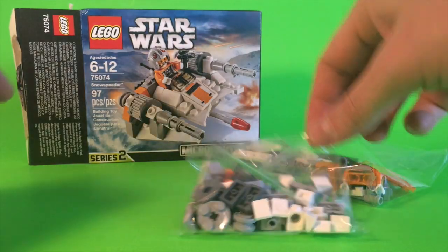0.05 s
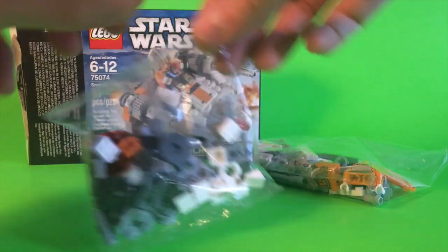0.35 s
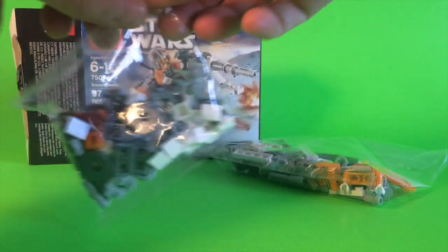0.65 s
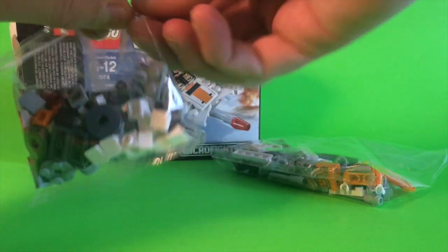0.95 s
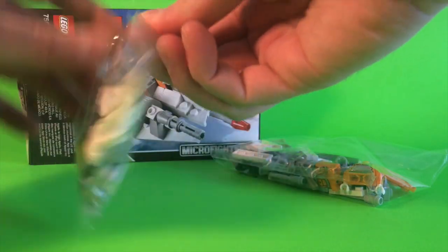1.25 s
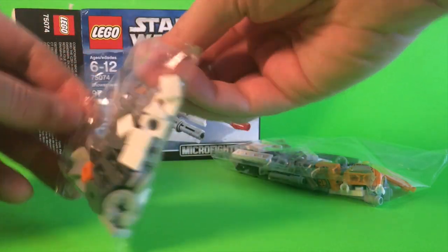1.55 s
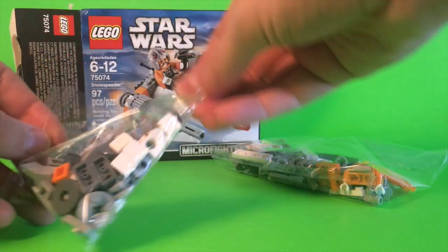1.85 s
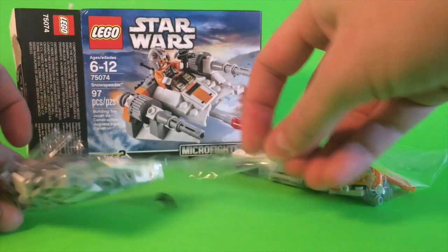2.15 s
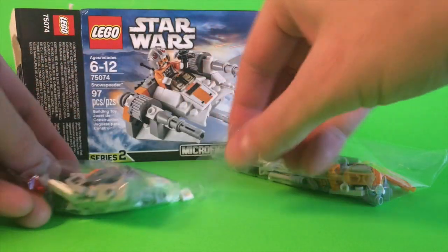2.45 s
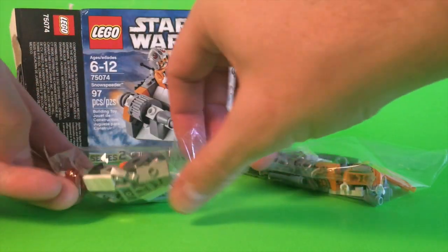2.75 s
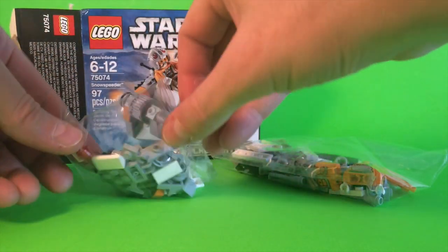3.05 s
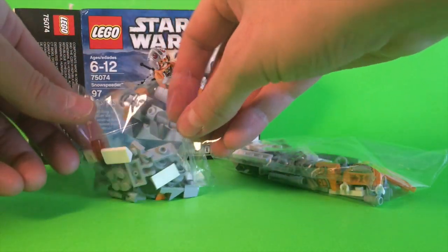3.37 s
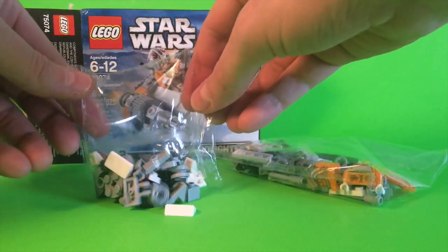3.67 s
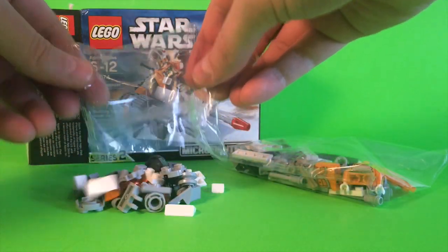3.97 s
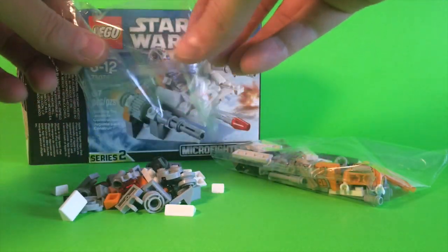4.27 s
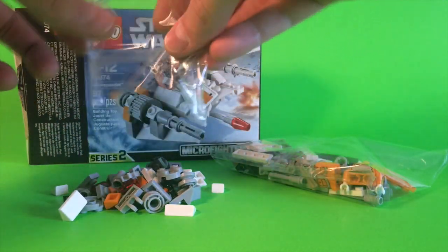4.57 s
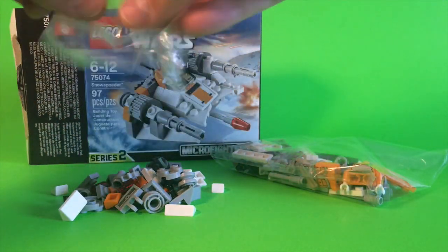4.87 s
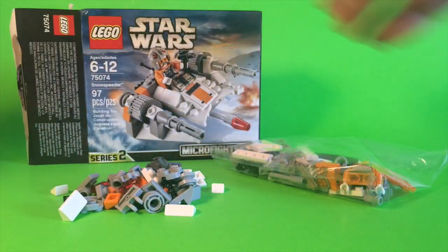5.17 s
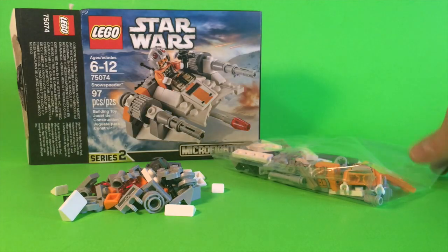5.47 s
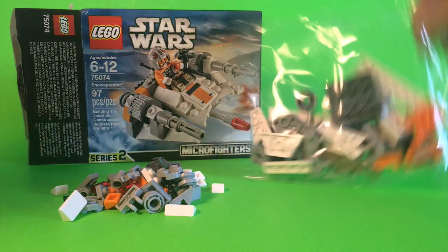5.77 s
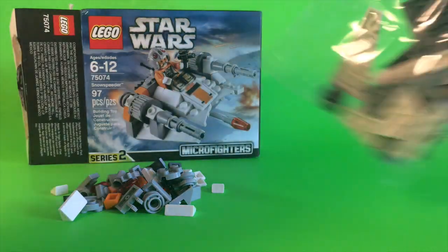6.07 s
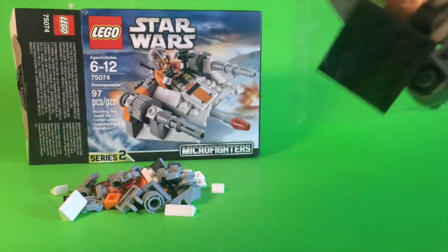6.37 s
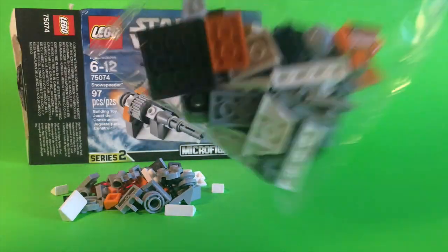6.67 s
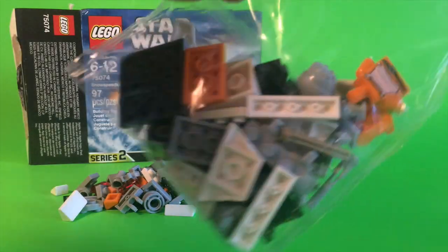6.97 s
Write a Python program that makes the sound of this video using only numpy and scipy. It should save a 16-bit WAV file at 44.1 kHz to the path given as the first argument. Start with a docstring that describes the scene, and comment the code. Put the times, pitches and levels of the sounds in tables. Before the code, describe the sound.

A thin plastic bag crinkles and snaps as it is pulled open and emptied, then small plastic bricks rattle in another bag.

```python
"""A thin plastic bag is pulled open on a table, and small plastic bricks are shaken out of it.
Its creases buckle in sharp snaps over a fine crinkle of tiny ticks; the bag's wall adds a hollow body
and the shifting load dull bumps. Then a second, full bag is lifted close to the microphone, and its
bricks slide, clack and ring. Underneath lie low room noise, a short opening hiss and a hum that
swells at the end. The room is small and fairly dry."""
import sys
import numpy as np
from scipy import signal
from scipy.fft import rfft, irfft
from scipy.io import wavfile
from scipy.ndimage import uniform_filter1d

SR = 44100
rng = np.random.default_rng(int(sys.argv[2]) if len(sys.argv) > 2 else 0)


def int16_out(signal):
    """Quantize to a 16-bit WAV file."""
    q = np.round(np.clip(np.atleast_2d(signal).T, -1, 1) * 32767)
    wavfile.write(sys.argv[1], SR, q.astype(np.int16))


N = 313992
TIME = np.arange(N) / SR
FULL_BAG_S = 5.55  # the full bag takes over here

# The room tone's fader. Each row: time in seconds, level in dB.
ROOM_TONE_FADER = [(0, -84), (.5, -70.5), (1.2, -61.5), (5.5, -61.5), (7.12, -65.5)]
# The low hum's fader. Each row: time in seconds, level in dB.
HUM_FADER = [(0, -86), (6.74, -62.5), (6.86, -57), (7.12, -48.5)]
# The first bag's loudest snaps, from creases buckling and bricks touching.
# Each row: start in seconds, level in dB, centre pitch in Hz.
FILM_SNAPS = [(.0817, -43, 6300), (.2393, -44.5, 4900), (.2807, -46.5, 9050), (.3294, -44, 6300),
              (.36, -41.5, 6850), (.5764, -37, 9600), (.6019, -38.5, 5100), (.6479, -39, 10500),
              (.668, -32, 7540), (.78, -39.5, 6100), (.9109, -29, 7900), (1.0475, -33, 5800),
              (1.07, -36, 6950), (1.1258, -33, 7100), (1.14, -31, 5500), (1.2074, -28, 5840),
              (1.3192, -26, 5860), (1.4355, -27, 6500), (1.462, -24, 7700), (1.5639, -26, 8150),
              (1.5876, -29.5, 6000), (1.6386, -34, 6830), (1.6467, -24, 7095), (1.6922, -27.5, 7850),
              (1.7253, -28.5, 6100), (1.7853, -35, 5450), (1.852, -30, 9770), (1.8618, -30.5, 8150),
              (1.9571, -25.5, 7300), (2.0036, -25.5, 7840), (2.0493, -29.5, 5120), (2.0667, -32, 9100),
              (2.076, -29.5, 6740), (2.1104, -26, 9700), (2.1263, -29, 10300), (2.1626, -32.5, 6820),
              (2.191, -29, 8600), (2.2151, -28, 8810), (2.2287, -25, 6400), (2.4699, -31, 8434),
              (2.5146, -30.5, 3094), (2.59, -34.5, 5230), (2.7013, -33.5, 8020), (2.777, -38.5, 5380),
              (2.845, -37, 5210), (2.8785, -27, 6580), (2.9357, -40, 4900), (3.0276, -29, 4010),
              (3.2182, -30.5, 7470), (3.3059, -30.5, 4495), (3.3335, -35, 2800), (3.3688, -29, 5990),
              (3.4258, -32.5, 6270), (3.4403, -32, 8500), (3.521, -26.5, 9700), (3.5971, -29, 5723),
              (3.654, -34, 4226), (3.695, -31, 6300), (3.706, -26.5, 6540), (3.8393, -29.5, 7107),
              (4.1151, -30, 5397), (4.1727, -33.5, 4494), (4.2247, -34, 7510), (4.2438, -27.5, 8080),
              (4.282, -28, 9770), (4.293, -29, 8004), (4.2997, -26, 7373), (4.3982, -29.5, 5044),
              (4.424, -22.5, 8880), (4.4814, -20.5, 5310), (4.6575, -24.5, 5407), (4.706, -25, 5494),
              (4.7518, -20.5, 6494), (4.8537, -22.5, 7780), (4.9172, -29, 5490), (4.972, -26, 6997),
              (5.0568, -25.5, 7396), (5.1385, -29.5, 5093), (5.1648, -30, 4885), (5.2867, -34, 7397),
              (5.4637, -43, 6860)]
# One rustle per hand move: the first bag is picked up, torn open, shaken out and crumpled, then the
# full one is lifted. Taut film is bright; slack film lets the body sound. Each row: start in seconds,
# length in seconds, level in dB, growth over the move in dB, brightness in dB, body against crinkle in dB.
HAND_MOVES = [ (0.296, 0.16, -60, -2, -1.5, -10), (0.59, 0.12, -48.5, -3.5, 1, -3),
              (0.804, .26, -48.5, 3.5, 2, -7.5), (1.123, 0.18, -41.5, 6, 2, -3.5),
              (1.314, 0.27, -38.5, -7, 2, -9), (1.677, .28, -43, -1.5, -1.5, -9.5),
              (2.029, 0.21, -37.5, 12, 1.5, -16), (2.279, 0.085, -48, 0, -1.5, -20),
              (2.371, 0.044, -39, -1, 1.5, -17), (2.478, 0.29, -43.5, 0, -1.5, -13.5),
              (2.849, 0.31, -41.5, 3, -2, -5), (3.188, .13, -46, -12, -0.5, -6),
              (3.421, .23, -40.5, -1, -1, -9), (3.72, 0.25, -44, 1, 1, -9.5),
              (3.972, .23, -41.5, -6, 1.5, -8), (4.289, .2, -41, 1, 2, -8), (4.504, 0.12, -32, 6, 2, -13),
              (4.746, 0.11, -32.5, -5, 2, -10.5), (4.88, 0.052, -40, -3, 1, -5),
              (4.966, .105, -34.5, 0, 3.5, -12), (5.118, .085, -42.5, -1, 1.5, -14),
              (5.305, 0.089, -43.5, 8, 2, -14.5), (5.548, 0.26, -48.5, -2.5, -6.5, -1.5),
              (5.8, .11, -39, 2, -9, -7.5), (5.912, .12, -34, -3, -3, -7.5), (6.039, 0.066, -29, 1, 1, -15),
              (6.125, .09, -43, -6, -6, 3), (6.285, 0.092, -34.5, 14, -1.5, -14.5),
              (6.423, 0.097, -32, -1, -0.5, -16), (6.711, .11, -43.5, 7, -4.5, -8),
              (6.851, 0.15, -52.5, 7, -4, -15)]
# Dull bumps as a bag's load shifts. Each row: start in seconds, level in dB, length in seconds.
LOAD_BUMPS = [(.335, -59.5, 0.052), (0.638, -53, 0.042), (1.324, -38.5, 0.025), (1.5, -55, .025),
              (2.85, -51, .04), (4.601, -53, .04), (4.772, -49, .02), (5.056, -52, 0.026),
              (5.903, -38.5, 0.031), (5.974, -42.5, 0.14), (6.295, -45, 0.11), (6.42, -37, 0.044),
              (6.479, -38, 0.041), (6.755, -45, 0.065), (6.999, -39.5, 0.027), (7.044, -36, 0.026)]
# A whole fold collapses in one short crunch. Each row: start in seconds, level in dB.
FOLD_CRUNCHES = [(.497, -50.5), (0.551, -45), (.897, -40.5), (1.314, -27.5), (1.513, -28), (1.682, -35.5),
                 (2.182, -33), (3.02, -34), (3.132, -35), (3.36, -37), (3.507, -37), (3.587, -36),
                 (4.412, -35.5), (4.772, -29.5), (5.922, -26), (6.439, -28.5), (6.64, -46.5),
                 (6.983, -40.5)]
# Single bricks chatter as they slide.
# Each row: start in seconds, level in dB, length in seconds, pitch in Hz.
BRICK_CHATTERS = [(1.13, -48, .08, 950), (3.302, -35, 0.0073, 3804), (6.042, -24, .035, 6700),
                  (6.36, -45, .18, 2842), (6.436, -33.5, 0.065, 4430), (6.805, -37, 0.043, 6230)]
# Bricks knock together in the full bag. Each row: start in seconds, level in dB, centre pitch in Hz.
BRICK_CLACKS = [(5.5915, -29.5, 2940), (5.6309, -37.5, 2870), (5.6582, -30.5, 4600), (5.717, -33.5, 5700),
                (5.9218, -19.5, 5300), (5.9467, -26.5, 4700), (6.101, -21, 4640), (6.1139, -24.5, 5800),
                (6.2254, -33, 3350), (6.244, -37, 7600), (6.2833, -26, 3584), (6.2905, -32, 4120),
                (6.375, -24, 4600), (6.3864, -29, 5480), (6.4443, -19.5, 4100), (6.4553, -23, 4490),
                (6.4883, -20, 4100), (6.5377, -23, 3640), (6.6731, -34.5, 6990), (6.708, -29, 3770),
                (6.7239, -26.5, 5060), (6.7457, -21, 3220), (6.7638, -22, 5135), (6.7969, -19, 5790),
                (6.8075, -24.5, 5850), (6.9466, -32, 4020), (7.0066, -22.5, 5300), (7.0512, -21, 5340),
                (7.0576, -24.5, 5100)]
# The bricks' ringing modes. Each row: pitch in Hz, relative level in dB, time to fall 60 dB in seconds.
BRICK_RESONANCES = [(1394, 2, 0.02), (2940, 5.5, 0.014), (4450, 9.5, 0.0092), (5100, 7.5, 0.016),
                    (5770, 10.5, 0.0072), (6640, 6, 0.015), (8340, 3.5, 0.021)]
# EQ curves that give each layer its colour. Each row: frequency in Hz, gain in dB.
ROOM_TONE_EQ = [(20, -48), (55, 4.5), (90, -1.5), (150, 5.5), (330, -7.5), (2000, -18), (15000, -30)]
HISS_EQ = [(60, -16), (400, -12.5), (1900, -8.0), (4200, -16), (5500, -42)]
FILM_EQ = [(100, -3.5), (400, -5), (900, 2), (2000, 1.5), (3500, 1), (6500, 0), (8500, -3.5), (11500, 0),
           (15000, -6.5)]
BAG_WALL_EQ = [(25, -41), (60, -19), (170, -14.5), (450, -3.5), (900, 6.5), (1350, 0.5), (2200, -13),
               (4000, -20)]
BUMP_EQ = [(30, -36), (80, -11.5), (170, -3), (240, -2), (400, -13), (1500, -47)]
BRICK_EQ = [(80, -6.5), (250, 6), (1700, -1.5), (3000, -5), (6500, -6.5), (9000, -7), (12000, -7),
            (15000, -15.5)]
# The room's reverb time. Each row: frequency in Hz, time to fall 60 dB in seconds.
REVERB_DECAY = [(150, 0.59), (15000, 0.2)]


def gain_of(db):
    """Decibels to a factor."""
    return 10 ** (np.asarray(db) / 20)


def unit_rms(x):
    """Scales to rms 1."""
    return x / np.sqrt(np.mean(x ** 2) + 1e-20)


def levelled(x, span_s):
    """Rides the gain to hold rms 1 over each span, keeping the finer grain."""
    size = max(int(span_s * SR), 8)
    power = abs(uniform_filter1d(uniform_filter1d(x ** 2, size), size))
    return x / np.sqrt(power + 1e-9 * np.mean(x ** 2))


def curve_at(curve, hz):
    """A curve's value at hz, on a log frequency axis."""
    points_hz, values = np.transpose(curve)
    return np.interp(np.log(hz + 1), np.log(points_hz + 1), values)


def fader(rows):
    """Fader points in dB to a gain for every sample."""
    return gain_of(np.interp(TIME, *np.transpose(rows)))


def add(mix, s, sound):
    """Mixes a sound in at s seconds."""
    part = mix[max(round(s * SR), 0):][:len(sound)]
    part += sound[:len(part)]


def coloured_noise(eq):
    """White noise through an EQ curve."""
    return irfft(rfft(rng.standard_normal(N)) * gain_of(curve_at(eq, np.fft.rfftfreq(N, 1 / SR))), N)


def swell(length_s):
    """An envelope with a quick rise and a rounded fall."""
    u = np.arange(SR // 2) / SR / length_s
    return (1 - np.exp(-10 * u)) * np.exp(-u ** 2)


def grains(per_s, spread_db):
    """A random train of many small and a few large impulses; rate and spread may vary over time."""
    train = np.zeros(len(per_s))
    at = np.flatnonzero(rng.random(len(per_s), dtype=np.float32) < per_s / SR)
    size_db = np.broadcast_to(spread_db, train.shape)[at] * np.minimum(rng.exponential(1, len(at)), 4)
    train[at] = gain_of(size_db) * rng.choice([-1., 1.], len(at))
    return train


def ringing(hz, t60, per_s, spread_db, size=N):
    """One resonance struck at random moments; rms 1."""
    t = np.arange(SR // 10) / SR
    ring = gain_of(-60 * t / t60) * np.sin(2 * np.pi * hz * t)
    strikes = grains(np.full(size, per_s), spread_db)
    return unit_rms(signal.oaconvolve(strikes, ring)[:size])


def room_tone(hum_hz=112.3):
    """A bed of low room noise, and a faint hum that swells near the end."""
    noise = fader(ROOM_TONE_FADER) * unit_rms(coloured_noise(ROOM_TONE_EQ))
    return noise + fader(HUM_FADER) * np.sin(2 * np.pi * hum_hz * TIME)


def soft_hiss():
    """A dull, faint hiss at the very start that fades out after a quarter second."""
    fade = np.interp(TIME, [.23, .27], [1, 0])
    return gain_of(-59.5) * fade * unit_rms(coloured_noise(HISS_EQ))


def patch_response(eq, centre_hz, focus_db, ripple_db, size=1024):
    """One small patch of plastic, tapped: its EQ, a hump at its own pitch, and chance resonances."""
    hz = np.fft.rfftfreq(size, 1 / SR)
    hump = np.exp(-np.log2((hz + 1) / centre_hz) ** 2)
    ripple = unit_rms(uniform_filter1d(rng.standard_normal(len(hz)), size=14))
    spectrum_db = curve_at(eq, hz) + focus_db * hump + ripple_db * ripple
    # minimum phase keeps the attack at the very front
    cepstrum = irfft(np.log(gain_of(spectrum_db)))
    cepstrum[1:size // 2] *= 2
    cepstrum[size // 2 + 1:] = 0
    return irfft(np.exp(rfft(cepstrum)))


def jolts(crack_s, shiver_s, shiver_db, size=1024):
    """A quick scatter of jolts, and the weak shiver of the plastic after them."""
    t = np.arange(size) / SR
    crack = np.sqrt(t / crack_s) * np.exp(-t / crack_s)
    shiver = gain_of(shiver_db) * np.exp(-t / shiver_s)
    return rng.standard_normal(size) * (crack + shiver)


def click(patch, drive):
    """A patch driven by its jolts; rms 1 over the first 3 ms."""
    sound = signal.fftconvolve(patch, drive)
    return sound / np.sqrt(np.mean(sound[:round(.003 * SR)] ** 2))


def hits(rows, eq, crack_s):
    """A crease buckles, or brick strikes brick, within a millisecond; a weaker rebound follows."""
    out = np.zeros(N)
    rebounds = rng.uniform([.001, -15], [.005, -5], (len(rows), 2))
    for (s, db, hz), (delay_s, rebound_db) in zip(rows, rebounds):
        # low hits come from hollow pieces and are more pitched than the film's own snaps
        focus_db = 9 + 11 * abs(np.log2(hz / 6500))
        patch = patch_response(eq, hz, focus_db, ripple_db=3)
        for start_s, hit_db in (s, db), (s + delay_s, db + rebound_db):
            drive = jolts(crack_s, shiver_s=.0025, shiver_db=-23)
            add(out, start_s, gain_of(hit_db) * click(patch, drive))
    return out


def film_snaps(level_db, strays_per_s=11):
    """The first bag's big snaps, plus stray creases giving way about 8 dB over the rustle."""
    when, force, pitch = rng.random((200, 3))[:round(strays_per_s * FULL_BAG_S)].T
    start_s = when * FULL_BAG_S
    db = level_db[(start_s * SR).astype(int)] + 8 + 2 * (2 * force - 1)
    hz = 8200 * 2 ** (.46 * (2 * pitch - 1))
    return hits(FILM_SNAPS + list(zip(start_s, db, hz)), FILM_EQ, crack_s=.0004)


def handling(attack_s=.012, release_db_per_s=260, settle_db_per_s=73, slip_s=.04):
    """Hand moves and crunches as three control curves: level, brightness and body, in dB."""
    t = np.arange(SR) / SR
    crunch_s, crunch_bright_db, crunch_body_db = .024, -1, -10.5
    rustles = [(s, gain_of(db) * swell(crunch_s), crunch_bright_db, crunch_body_db)
               for s, db in FOLD_CRUNCHES]
    for s, length, db, growth_db, bright_db, body_db in HAND_MOVES:
        hold_db = db + growth_db * (np.minimum(t / length, 1) - .5)
        after_s = np.maximum(t - length, 0)
        # a fast release, then a quiet tail as the creases go on easing
        release_db = np.maximum(-release_db_per_s * after_s, -18 - settle_db_per_s * after_s)
        envelope = np.minimum(t / attack_s, 1) * gain_of(hold_db + release_db)
        rustles.append((s, envelope, bright_db, body_db))
    power, bright, body = np.zeros((3, N))
    for s, envelope, bright_db, body_db in rustles:  # where they overlap, the louder sets the colour
        add(power, s, envelope ** 2)
        add(bright, s, bright_db * envelope ** 2)
        add(body, s, body_db * envelope ** 2)
    power += gain_of(-74) ** 2  # the film creeps faintly even when left alone
    # fingers slip and catch, so every rustle wavers
    waver_db = .69 * np.interp(TIME / slip_s, np.arange(N), rng.standard_normal(N))
    return 10 * np.log10(power) + waver_db, bright / power, body / power


def crackle(eq, per_s, spread_db, bright_db, patches=24):
    """Tiny ticks from many patches, each with its own pitch; returns their sound and their joint push."""
    sound, push = np.zeros((2, len(per_s)))
    for hz in np.geomspace(2000, 13500, patches):
        train = grains(per_s / patches, spread_db)
        push += train
        at = np.flatnonzero(train)
        train[at] *= gain_of(1.24 * bright_db[at] * np.log2(hz / 6000))  # taut film favours the top end
        drive = jolts(crack_s=.00015, shiver_s=.002, shiver_db=-22)
        tick = click(patch_response(eq, hz, focus_db=14.5, ripple_db=3), drive)
        sound += signal.oaconvolve(train, tick)[:len(train)]
    return sound, push


def avalanches(per_s, length_s, depth):
    """One crease sets off its neighbours: a gain that jumps in short clumps."""
    u = np.arange(SR // 10) / SR / length_s
    triggers = abs(grains(np.full(N, per_s), spread_db=4))
    clumps = signal.oaconvolve(triggers, u * np.exp(-u))[:N]
    return 1 + depth * unit_rms(clumps)


def rustle(level_db, bright_db, body_db):
    """Gentle handling gives separate ticks; hard handling packs them into a dense crinkle."""
    effort = np.clip((level_db + 50) / 20, 0, 1)
    per_s, spread_db = 1300 + 3700 * effort ** 2, 5 - 1.8 * effort
    cut = round(FULL_BAG_S * SR)
    film = crackle(FILM_EQ, per_s[:cut], spread_db[:cut], bright_db[:cut])
    # in the full bag, many bricks slide at once against the film
    sliding = crackle(BRICK_EQ, 2 * per_s[cut:], spread_db[cut:] - .5, bright_db[cut:] + 1.5)
    ticks, push = np.concatenate([film, sliding], axis=1)
    # every tick shakes the wall of the bag, and loose bricks add hollow knocks of their own pitch
    wall_response = patch_response(BAG_WALL_EQ, 990, focus_db=0, ripple_db=-2)
    wall = unit_rms(signal.oaconvolve(push / np.sqrt(per_s), wall_response)[:N])
    knock_hz = np.linspace(330, 2100, 13)
    knocks = unit_rms(sum(ringing(hz, t60=.018, per_s=9, spread_db=4.8) for hz in knock_hz))
    clumps = avalanches(per_s=65, length_s=.003, depth=2.3 - 1.2 * effort)
    crinkle = levelled(clumps * ticks, span_s=.038)
    body = levelled(clumps * wall + 2 * knocks, span_s=.038)
    return gain_of(level_db + .04) * crinkle + gain_of(level_db + body_db) * body


def load_bumps():
    """The load slumps: a low push that builds quickly and dies away."""
    envelope = np.zeros(N)
    for s, db, length in LOAD_BUMPS:
        add(envelope, s, gain_of(db) * swell(length))
    return envelope * levelled(coloured_noise(BUMP_EQ), span_s=.0072)


def brick_chatter():
    """A loose brick skips along its neighbours and keeps ringing at one pitch."""
    out = np.zeros(N)
    for s, db, length, hz in BRICK_CHATTERS:
        skips = ringing(hz, t60=.0098, per_s=600, spread_db=4.3, size=SR // 2)
        add(out, s, gain_of(db) * swell(length) * skips)
    return out


def brick_ring(level_db):
    """When the full bag is shaken hard its bricks ring, now one mode and now another."""
    cut = round(FULL_BAG_S * SR)
    ring = np.zeros(N)
    for hz, db, t60 in BRICK_RESONANCES:
        contact = abs(uniform_filter1d(rng.standard_normal(N - cut), size=1500))
        mode = ringing(hz, t60, per_s=350, spread_db=2, size=N - cut)
        ring[cut:] += gain_of(db) * unit_rms(contact * mode)
    damping_db = .38 * np.minimum(level_db + 27, 0)  # bricks at rest damp each other
    return ring * gain_of(level_db + damping_db - 15.5)


def brick_clacks():
    """Brick strikes brick in the full bag, with a slightly blunter attack than the film's snaps."""
    return hits(BRICK_CLACKS, BRICK_EQ, crack_s=.00055)


def room_reverb(x, reflections_per_s=4000, predelay_s=.003):
    """Sparse reflections of random sign, the treble dying first."""
    size = SR // 2
    taps = rng.choice([-1., 1.], size) * (rng.random(size) < reflections_per_s / SR)
    taps *= np.arange(size) / SR > predelay_s
    hz, t, spectra = signal.stft(taps, SR, nperseg=256)
    decay = gain_of(-60 * t / curve_at(REVERB_DECAY, hz)[:, None])
    tail = signal.istft(spectra * decay, SR, nperseg=256)[1]
    return signal.oaconvolve(x, tail / np.linalg.norm(tail))[:N]


def scene():
    """The mono mix: film and bricks up close, a touch of reverb, and the quiet bed beneath."""
    level_db, bright_db, body_db = handling()
    close = rustle(level_db, bright_db, body_db) + brick_ring(level_db) + brick_chatter() + load_bumps()
    close += brick_clacks() + film_snaps(level_db)
    return (close + gain_of(-15) * room_reverb(close) + room_tone() + soft_hiss())[None]


def record(dry, low_cut_hz=45, high_cut_hz=15750):
    """The small microphone loses the deepest bass; the recorder's band limit trims the very top."""
    low_cut = signal.butter(4, low_cut_hz, "highpass", fs=SR, output="sos")
    high_cut = signal.firwin(255, high_cut_hz, window=("kaiser", 9), fs=SR)
    return signal.oaconvolve(signal.sosfilt(low_cut, dry), high_cut[None], "same")


dry = scene()
out = record(dry)
int16_out(out)
```